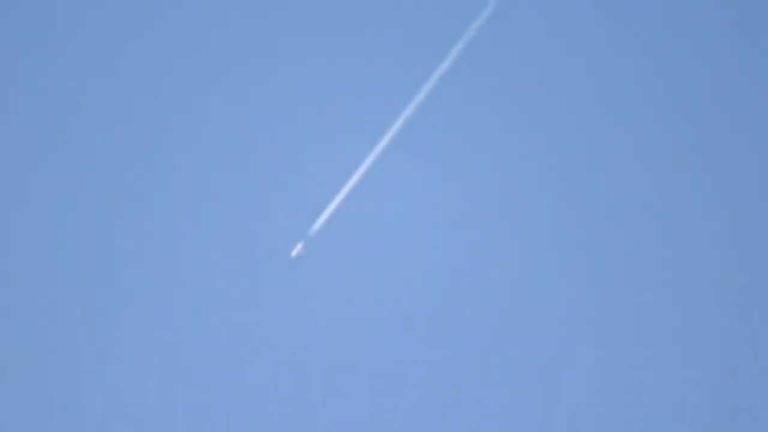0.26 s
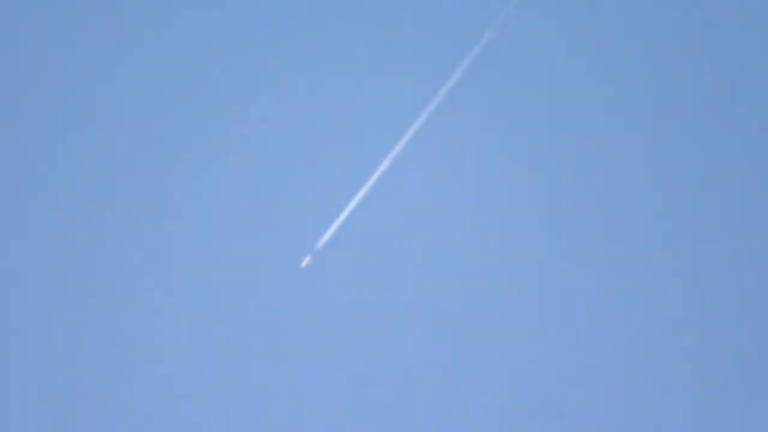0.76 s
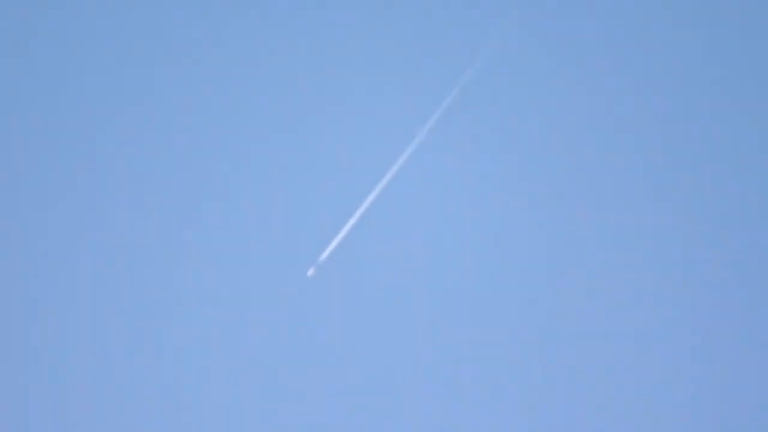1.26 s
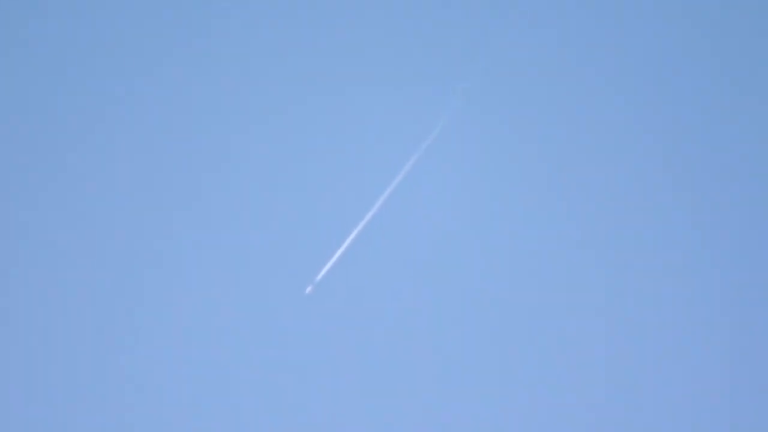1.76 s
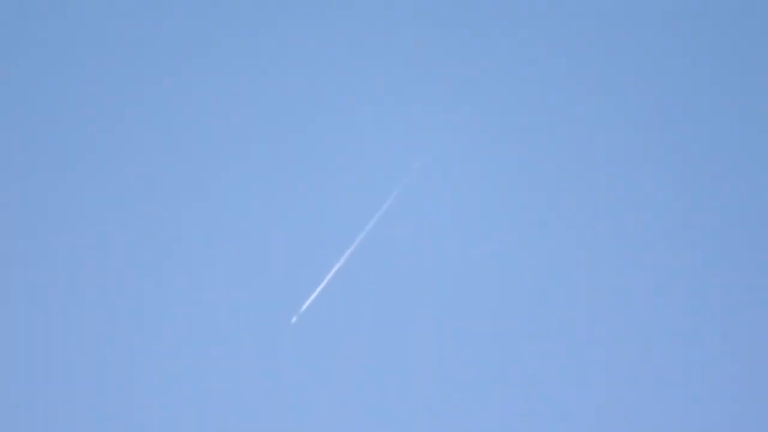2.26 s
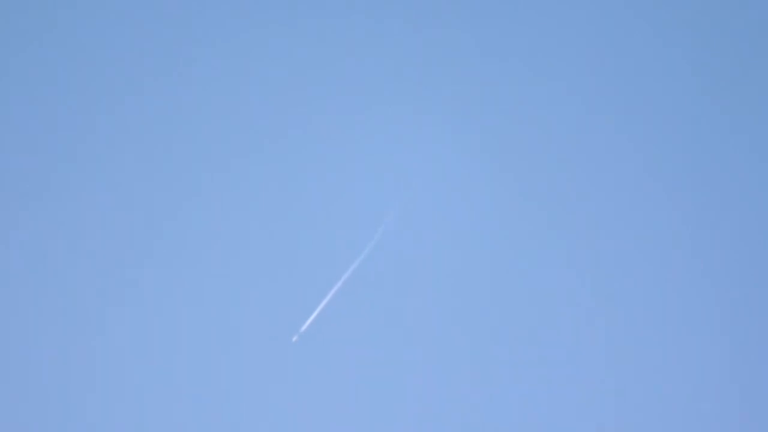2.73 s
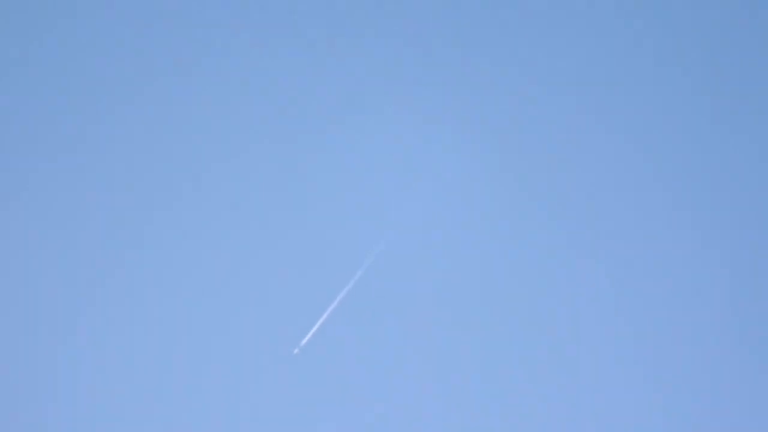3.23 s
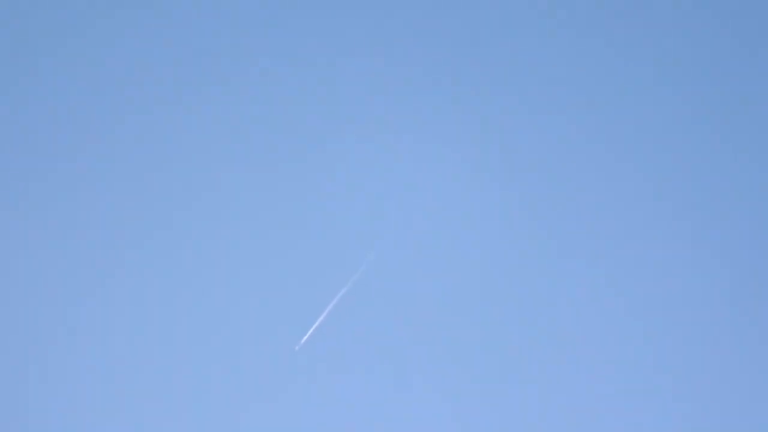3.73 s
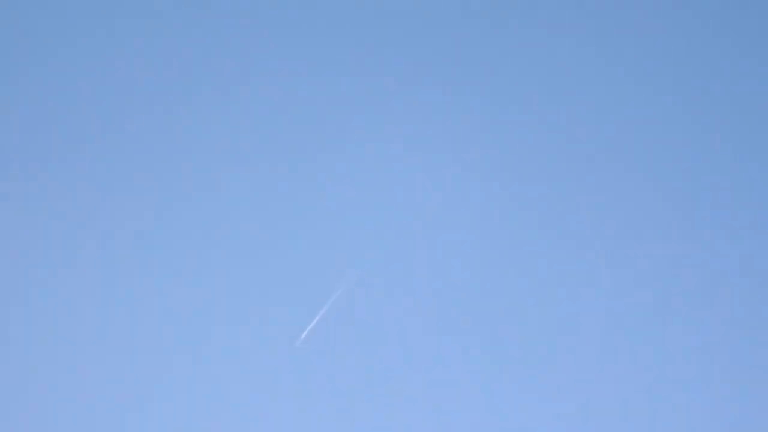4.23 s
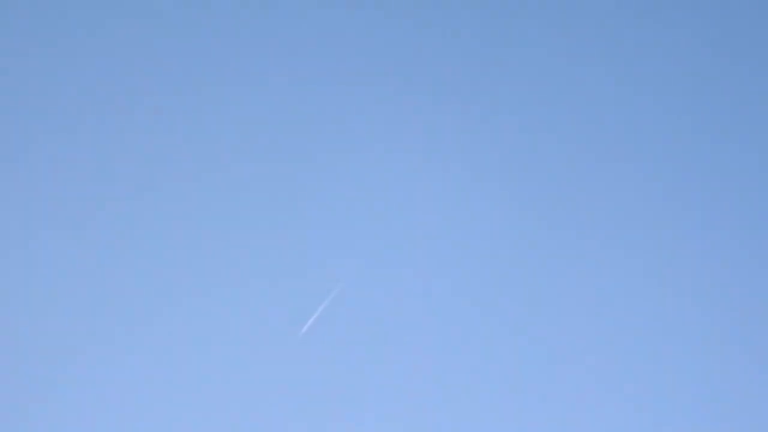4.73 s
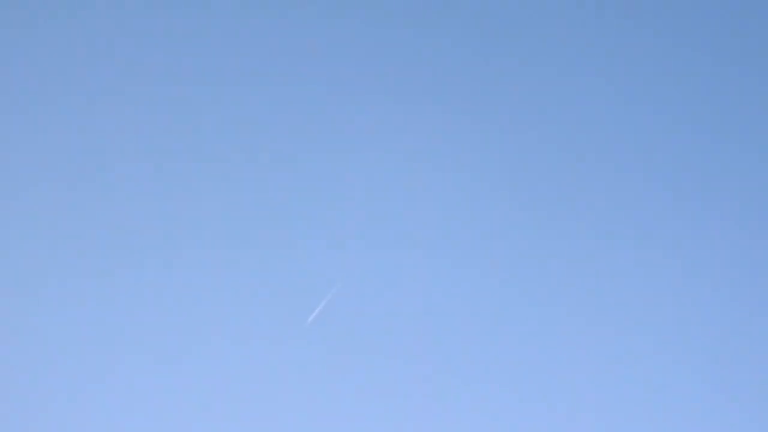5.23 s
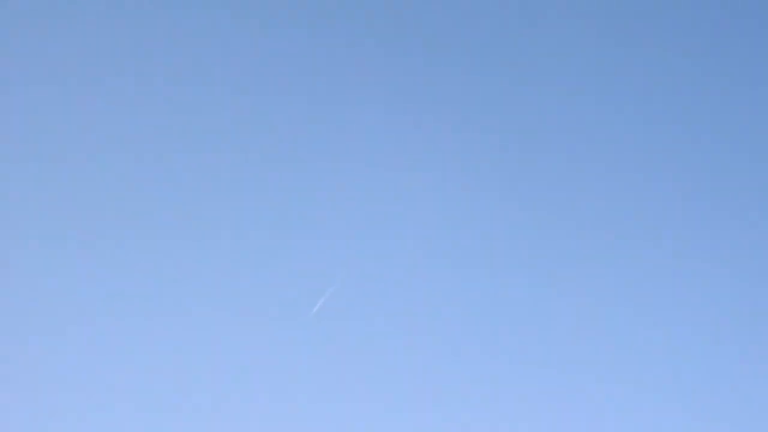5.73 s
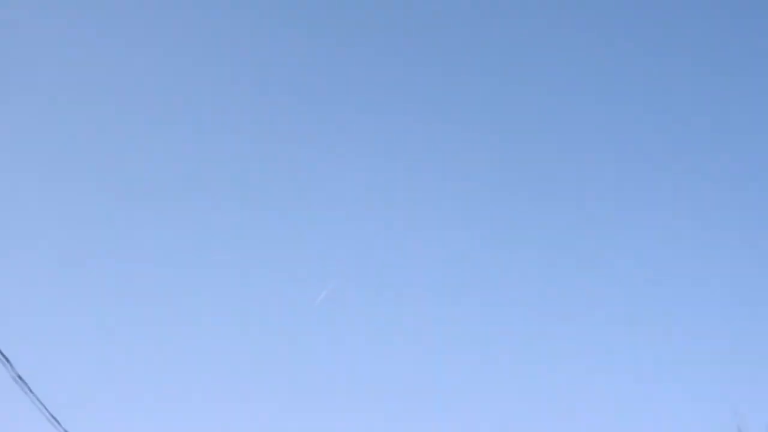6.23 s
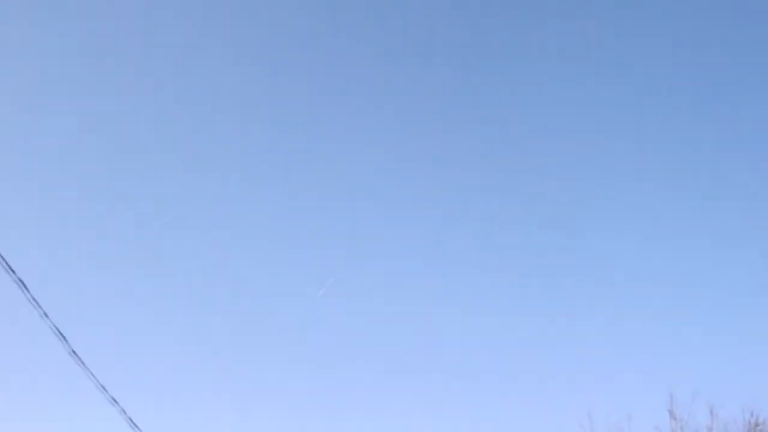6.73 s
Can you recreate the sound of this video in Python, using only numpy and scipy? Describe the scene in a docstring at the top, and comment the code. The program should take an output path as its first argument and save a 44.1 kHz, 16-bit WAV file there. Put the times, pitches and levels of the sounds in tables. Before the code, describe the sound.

A camcorder's small zoom motor whirs steadily, heard up close through its own microphone outdoors. The buzzy tone wavers slightly, and from about halfway faint high squeaks join in. Near the end fingers knock the case, plastic parts click sharply and the motor stops. A low rumble, light wind and hiss lie underneath throughout.

```python
"""A camcorder zooms out in the open air

Its own microphone hears the little zoom motor: six ticks a turn ring the plastic body, and the speed
wavers as the lens gears drag. From mid zoom on, the dry shaft chirps. Near the end a hand knocks the
case, plastic parts click and the motor stops. Under it all: a low rumble, light wind and hiss."""
import sys
import numpy as np
from scipy import signal
from scipy.fft import rfft, irfft
from scipy.io import wavfile
from scipy.ndimage import map_coordinates

SR = 44100
rng = np.random.default_rng(int(sys.argv[2]) if len(sys.argv) > 2 else 0)


def unload_audio(sound):
    """Save the sound as a 16-bit wav file, at the path given as the first command line argument."""
    columns = np.transpose(np.atleast_2d(sound))
    # keep every value between -1 and 1, then stretch to whole-number steps
    steps = np.round(np.clip(columns, -1, 1) * 32767)
    wavfile.write(sys.argv[1], SR, steps.astype(np.int16))


N = 307641
TIME = np.arange(N) / SR
BINS = np.fft.rfftfreq(4096, 1 / SR)  # the frequencies at which a ringing body is worked out
STOP_S = 6.897  # the motor stops

# the six ticks of one shaft turn: level/dB, lateness/share of the gap between ticks
TURN_TICKS = [(1.1, .025), (-1.1, -.02), (1.3, 0), (-.7, .025), (.4, -.02), (-1.9, 0)]


def undb(db):
    """Turn decibels into a factor to multiply by."""
    return 10 ** (np.asarray(db) / 20)


def unit(x):
    """Scale a signal to an average strength (rms) of 1."""
    return x / np.sqrt(np.mean(x ** 2))


def curve(points):
    """Join (time, value) points with straight lines."""
    return np.interp(TIME, *np.transpose(points))


def noise(points):
    """Noise of strength 1 whose colour follows (f/Hz, level/dB) points."""
    hz, db = np.transpose(points)
    f = np.maximum(np.fft.rfftfreq(N, 1 / SR), 1)
    gain = undb(np.interp(np.log(f), np.log(hz), db)) * np.minimum(f / hz[0], 1) ** 2
    return unit(irfft(rfft(rng.standard_normal(N)) * gain, N))


def sway(hz, width_hz):
    """A random wobble of strength 1 that swings about hz times a second."""
    band = signal.iirpeak(hz, hz / width_hz, fs=SR)
    wobble = signal.lfilter(*band, rng.standard_normal(N + SR))
    return unit(signal.lfilter(*band, wobble)[SR:])


def ring(hz, width_hz, db):
    """How a body rings after one tap, given its resonances (the pitches it favours)."""
    power = undb(db) ** 2 @ (1 + (2 * (BINS - hz[:, None]) / width_hz[:, None]) ** 2) ** -2
    # keeping half of the cepstrum puts all the ringing after the tap
    cepstrum = irfft(np.log(power + 1e-7))
    cepstrum[0] /= 2
    cepstrum[len(BINS):] = 0
    return irfft(np.exp(rfft(cepstrum)))


def bend(response):
    """Low bending waves travel slower, so each tick falls in pitch; part of it circles the case."""
    lag_s, lap_s, feedback = .003, .0013, .12
    chirp = np.exp(-4j * np.pi * lag_s * np.sqrt(1000 * BINS))
    lap = np.exp(-2j * np.pi * lap_s * BINS)
    return irfft(rfft(response) * chirp * (lap - feedback) / (1 - feedback * lap))


def impulses(times, sizes):
    """Tiny taps at exact times, even between two samples."""
    at = times[:, None] * SR
    nearby = at.astype(int) + np.arange(-7, 9)
    out = np.zeros(N)
    np.add.at(out, np.clip(nearby, 0, N - 1), sizes[:, None] * np.sinc(nearby - at))
    return out


def fade(x, t60):
    """Give every tap a tail that dies away by 60 dB in t60 seconds."""
    return signal.lfilter([1], [1, -undb(-60 / (t60 * SR))], x)


def burst(start, peak_db, t60, response):
    """A blow and its short rattle make a body ring."""
    age = TIME[:len(BINS) * 2]
    contact = rng.standard_normal(len(age)) * undb(-60 * age / t60)
    contact[0] = 6  # the first touch stands out of the rattle
    sound = signal.fftconvolve(contact, response)
    out, first = np.zeros(N + len(sound)), int(start * SR)
    out[first:first + len(sound)] = undb(peak_db) * sound / abs(sound).max()
    return out[:N]


def nearness(place):
    """1 while the lens is at this place of its travel, falling to 0 at the places next to it."""
    # lens travel: t/s, place (0 fully zoomed in, 1 zoomed in, 2 mid zoom, 3 wide view)
    travel = [(0, 0), (1.5, 0.5), (2.35, 1), (2.68, 1.5), (2.92, 2), (4.3, 2), (4.8, 3), (6.9, 3)]
    return np.clip(1 - abs(curve(travel) - place), 0, 1)


def motor_speed():
    """Ticks per second: the gears catch and brake the motor, which then overshoots a little."""
    tick_hz, catch_wait_s, catch_s, catch_loss = 189.9, .09, .018, .1396
    wait, loss = rng.uniform(.45, 1.55, (160, 2)).T
    starts = np.cumsum(wait * catch_wait_s)
    catches = impulses(starts, loss * catch_loss * (starts < STOP_S))
    offset = np.arange(-SR // 10, SR // 10) / SR / catch_s
    dip = (1 - offset ** 2) * np.exp(-offset ** 2 / 2)
    drag = signal.fftconvolve(catches, dip, "same")
    flutter = .02415 * sway(hz=18, width_hz=16.25) + .01 * sway(hz=2.5, width_hz=3)
    free = np.exp(-((TIME - 4.85) / .34) ** 4)  # for a moment the gears run free
    labour = np.exp(np.minimum(TIME - STOP_S, 0) / .2)  # the motor struggles just before it stops
    unrest = (1 - .893 * free) * (1 - .249 * nearness(place=3))
    return tick_hz * (1 + .047 * free - .05 * labour + unrest * (flutter - drag))


def commutator():
    """The motor's turning switch ticks: gives the shaft angle in turns, tick times and tick sizes."""
    phase = np.cumsum(motor_speed()) / SR
    tick = np.arange(int(phase[-1]))
    slot_db, late = np.array(TURN_TICKS)[tick % len(TURN_TICKS)].T
    time_jitter, level_jitter = rng.standard_normal((N // 100, 2))[tick].T
    times = np.interp(tick + late + .004 * time_jitter, phase, TIME)
    # the gear teeth press harder and softer, most of all at mid zoom
    slack_db = .94 + .41 * nearness(place=2)
    teeth_db = slack_db * sway(hz=20, width_hz=19) + .47 * sway(hz=9.1, width_hz=20)
    sizes = undb(slot_db + np.interp(times, TIME, teeth_db) + .6 * level_jitter)
    return phase / len(TURN_TICKS), times, sizes


def brush_rub(angle, ticks):
    """The brushes (sliding contacts) rub over the same scratches every turn, plus random grit."""
    scratches = rng.standard_normal(size=1400)
    track = map_coordinates(scratches, [angle % 1 * len(scratches)], mode="grid-wrap")
    grit = undb(.5) * rng.standard_normal(N)
    return unit(fade(ticks, t60=.021) * (track + grit))


def case_whir(force):
    """The shaken case rings, and its tone shifts as the lens travels."""
    # resonances of the case: f/Hz, width/Hz, then relative level/dB at each of the four lens places
    case_modes = [(755, 230, -12.5, -14, -18, -23), (980, 210, -9, -9, -9, -6.5),
                  (1161, 85, 3, 1, -1, -4.5), (1258, 172, 2, 2.5, -3.5, -1.5), (1443, 128, -0.5, 0, -2, 0),
                  (1640, 122, -2.5, 0, -6, -5), (2063, 670, -6, -5.5, -8, -7.5),
                  (2415, 164, -0.5, 0.5, -0.5, 0), (2713, 90, 0.5, -8, -8, -4),
                  (2902, 130, -4.5, -4, -5, -11), (3083, 323, -9.5, -3.5, -6, -8.5),
                  (3444, 170, -24, -18, -19.5, -14), (4090, 390, -19, -16.5, -14.5, -15),
                  (4365, 310, -14.5, -11.5, -16.5, -16), (4690, 210, -29, -29, -19, -27),
                  (5500, 1200, -25.5, -29, -26.5, -29), (7460, 580, -23, -22, -26, -30.5)]
    # base loudness of the whir at each lens place: level/dB
    place_db = [-39, -38, -43, -42]
    hz, width, *colours = np.array(case_modes, float).T
    whir = 0
    for place, db in enumerate(colours):
        ringing = signal.fftconvolve(force, bend(ring(hz, width, db)))[:N]
        whir = whir + nearness(place) * undb(place_db[place]) * unit(ringing)
    load_db = .93 * np.maximum(TIME - 4.93, 0)  # the load grows near the end of travel
    return whir * undb(load_db)


def motor():
    """Ticks and brush rub shake the case, and the shaft chirps, until the motor stops."""
    angle, times, sizes = commutator()
    ticks = impulses(times, sizes)
    rub = brush_rub(angle, ticks)
    # most of the push circles twice a turn, which lifts every overtone by a third of the tick rate
    circling, standing = np.exp(2j * np.pi * 2 * angle), undb(-21.5)
    push = np.real(signal.hilbert(ticks) * (circling + standing))
    # the blunt ticks drive the low resonances; the rub drives the high ones
    lows = signal.lfilter(*signal.butter(4, 4000, "low", fs=SR), unit(push) + undb(-25) * rub)
    highs = signal.lfilter(*signal.butter(4, 4000, "high", fs=SR), rub)
    running = np.clip((STOP_S - TIME) / .0043 + 1, 0, 1)
    return running * (case_whir(lows + highs) + shaft_chirps(times[::len(TURN_TICKS)]))


def rumble():
    """A far outdoor rumble that slowly swells."""
    # colour of the rumble: f/Hz, relative level/dB
    spectrum = [(12, -5), (25, 2.5), (40, -8.5), (52, -9), (70, -7.5), (88, -15), (120, -14), (160, -13),
                (205, -10.5), (265, -15.5), (320, -23), (560, -31), (1000, -25), (3000, -56)]
    swell_db = curve([(0, -.5), (N / SR, .8)]) + .45 * sway(hz=1.56, width_hz=4.5)
    return noise(spectrum) * undb(-40 + swell_db)


def wind():
    """Soft gusts of air push on the microphone and slowly ease."""
    start_db, ease_db_per_s = -40, 1
    gusts_db = start_db - ease_db_per_s * TIME + 1.5 * sway(hz=.78, width_hz=1.4)
    return noise([(14, 2), (28, -1.5), (60, -17), (110, -28), (400, -69)]) * undb(gusts_db)


def hiss():
    """Microphone hiss that spits faintly each time the picture sensor is read."""
    # colour of the hiss: f/Hz, relative level/dB
    spectrum = [(500, 10.5), (3000, 18), (6500, -3.5), (9000, -4), (13000, -3), (16000, -7)]
    readout_hz = 29.5
    readout = (TIME * readout_hz - .11) % 1 < .04
    return noise(spectrum) * undb(-49.5) * (1 + undb(2.5) * readout)


def plastic_clicks():
    """Small plastic parts click sharply, each ringing at three pitches."""
    # clicks: t/s, peak level/dB, centre f/Hz, fade time/s
    clicks = [(2.024, -40, 6500, .012), (6.7188, -18, 2850, .014), (6.719, -31, 5200, .008),
              (6.7212, -19.5, 2000, .012), (6.758, -32, 3200, .02), (6.764, -30, 2900, .012),
              (6.8235, -28, 2600, .015), (6.871, -32, 2900, .015)]
    ratios, widths, db = np.array([.42, .68, 1.12]), np.array([.2, .3, .4]), [-3, -2, 0]
    return sum(burst(start, peak_db, t60, ring(hz * ratios, hz * widths, db))
               for start, peak_db, hz, t60 in clicks)


def shaft_chirps(turn_times):
    """Once it runs dry, the shaft chirps unevenly about once a turn, with a few louder squeaks."""
    # the louder squeaks: t/s, peak level/dB
    squeaks = [(2.877, -44), (3.292, -48), (3.612, -46), (3.639, -44), (3.675, -39), (3.766, -44),
               (3.797, -40), (3.833, -43), (3.861, -41), (4.655, -43), (5.087, -44), (5.241, -43),
               (6.663, -47), (6.818, -44)]
    dry_from_s, chirp_db = 2.83, -69
    time_jitter, level_jitter = rng.standard_normal((N // 100, 2))[:len(turn_times)].T
    sizes = (turn_times > dry_from_s) * undb(4 * np.clip(level_jitter, -2, 1.1))
    slips = impulses(turn_times + .003 * time_jitter, sizes)
    ping = ring(hz=np.array([5450, 5950]), width_hz=np.array([480, 600]), db=[0, -6])
    chirps = signal.fftconvolve(fade(slips, t60=.033) * rng.standard_normal(N), ping)[:N]
    swell = undb(.5 * sway(hz=2.7, width_hz=3.3))
    loud = sum(burst(start, peak_db, t60=.018, response=ping) for start, peak_db in squeaks)
    return unit(chirps * swell) * undb(chirp_db) + loud


def finger_knocks():
    """Fingers knock the case, which rings dully."""
    # knocks: t/s, peak level/dB, f/Hz above which the knock is muffled, fade time/s
    knocks = [(3.215, -30, 650, .06), (6.5735, -25, 900, .02), (6.5962, -19, 2400, .035),
              (6.601, -20.5, 1900, .045), (6.617, -27, 1400, .05), (6.624, -28, 1400, .07),
              (6.783, -31, 700, .04)]
    # resonances that a knock rings: f/Hz, width/Hz, relative level/dB
    knock_modes = [(740, 220, -10), (982, 200, 0), (1170, 180, -7), (1370, 140, -1), (1510, 130, -10),
                   (1790, 200, -5), (2200, 260, 2.5), (2980, 430, -2.5), (3970, 710, -11)]
    hz, width, db = np.array(knock_modes, float).T
    out = 0
    for start, peak_db, corner_hz, t60 in knocks:
        muffle_db = 10 * np.log10(1 + (hz / corner_hz) ** 4)
        out = out + burst(start, peak_db, t60, ring(hz, width, db - muffle_db))
    return out


def scene():
    """Motor, hand and open air at one hissing microphone."""
    return (motor() + finger_knocks() + plastic_clicks() + rumble() + wind() + hiss())[None]


def record(dry):
    """The camcorder steeply cuts off the highest treble."""
    top_hz = 15700
    return signal.sosfilt(signal.ellip(10, .2, 70, top_hz, fs=SR, output="sos"), dry)


dry = scene()
out = record(dry)
unload_audio(out)
```